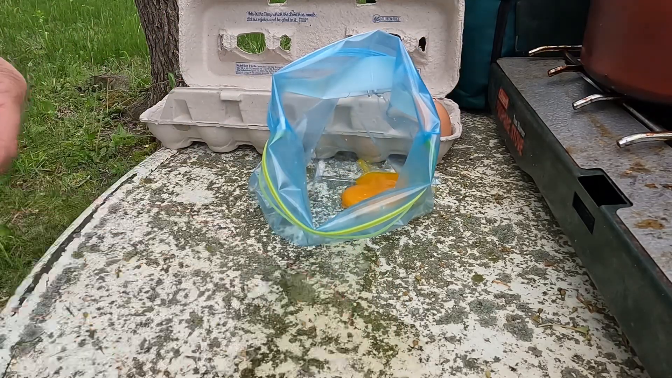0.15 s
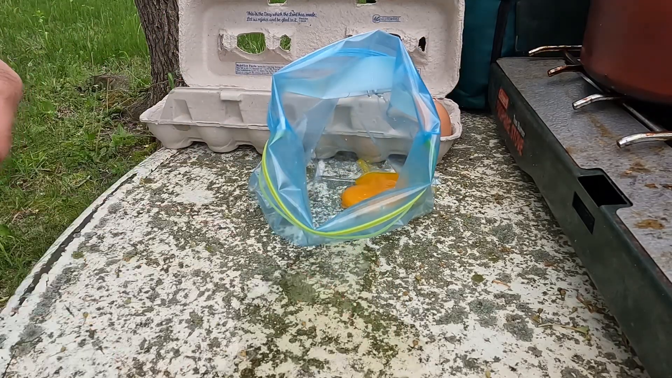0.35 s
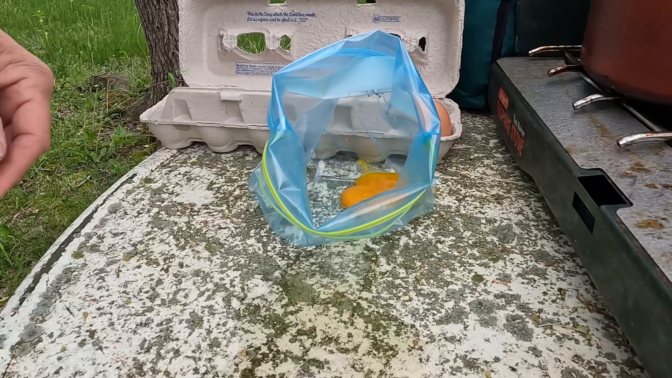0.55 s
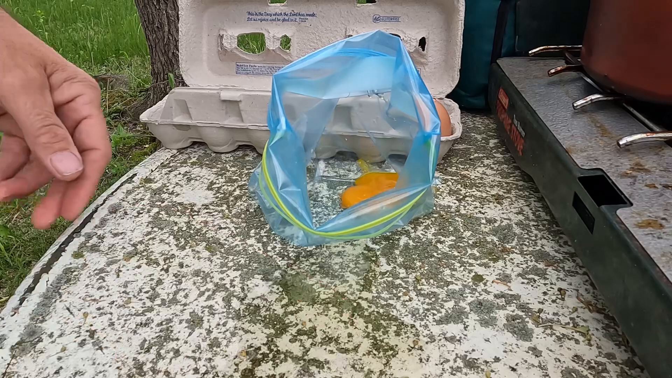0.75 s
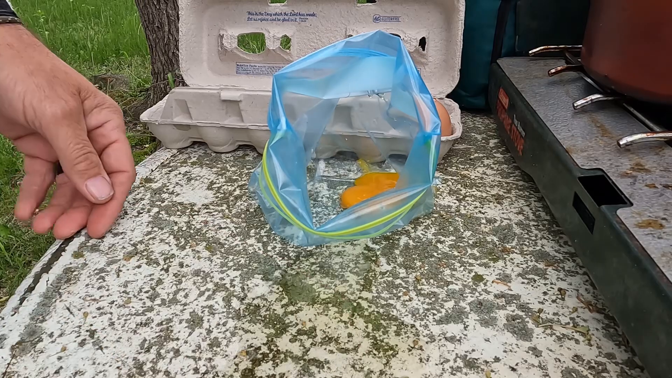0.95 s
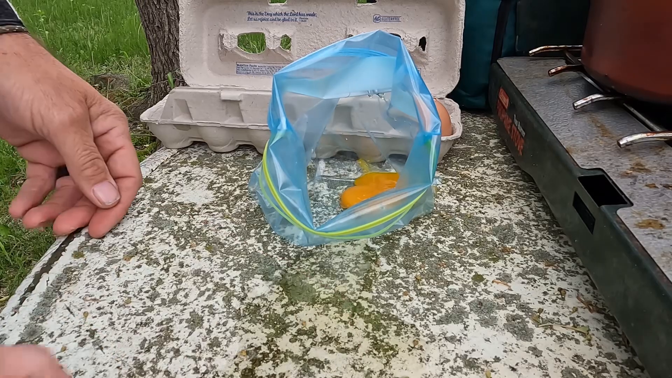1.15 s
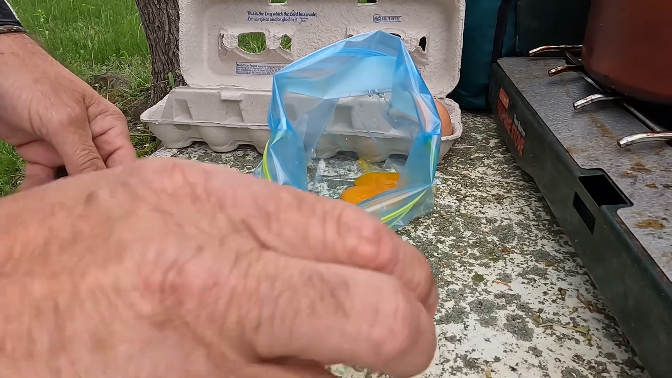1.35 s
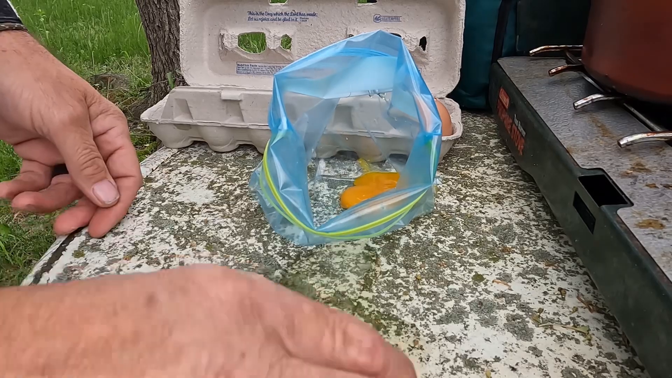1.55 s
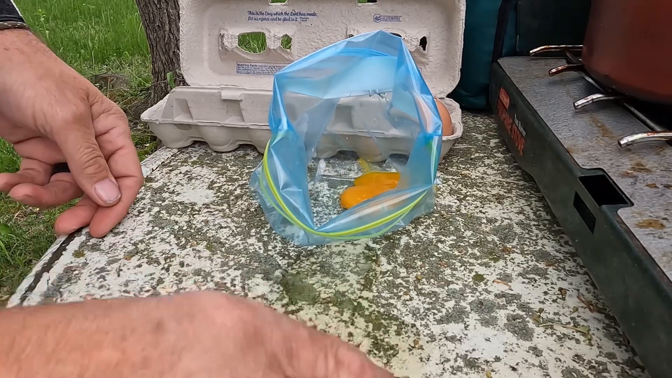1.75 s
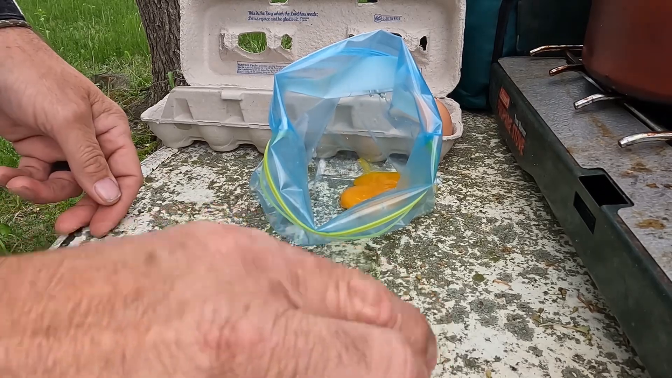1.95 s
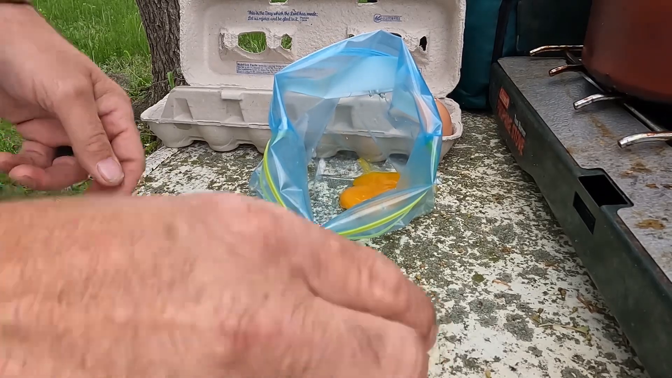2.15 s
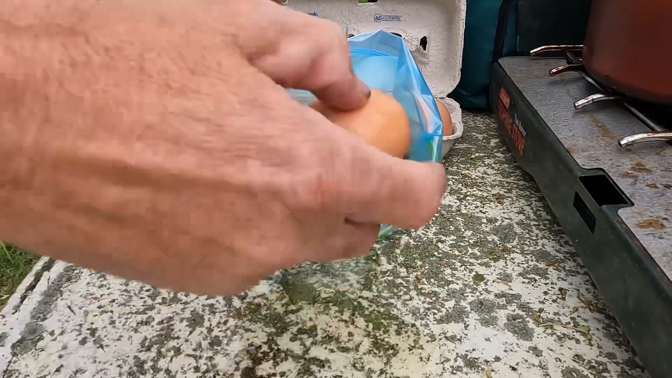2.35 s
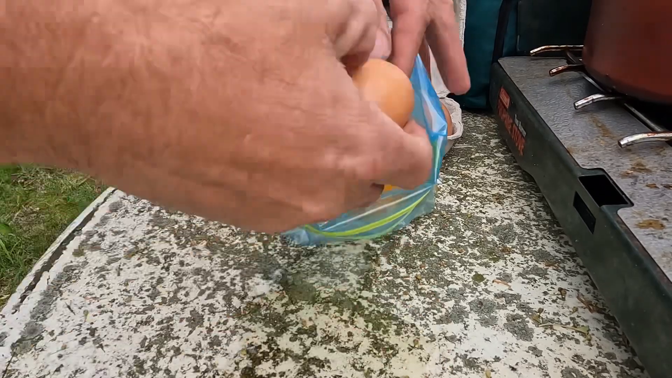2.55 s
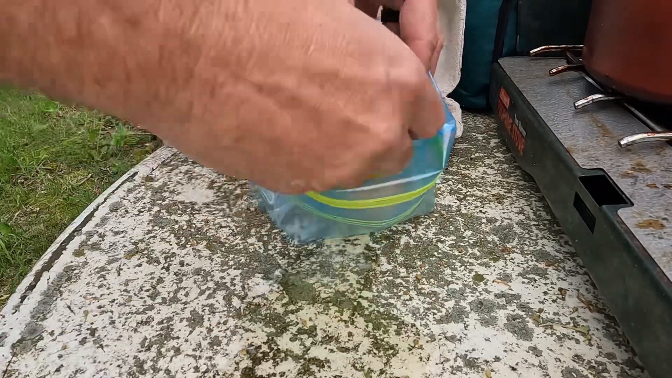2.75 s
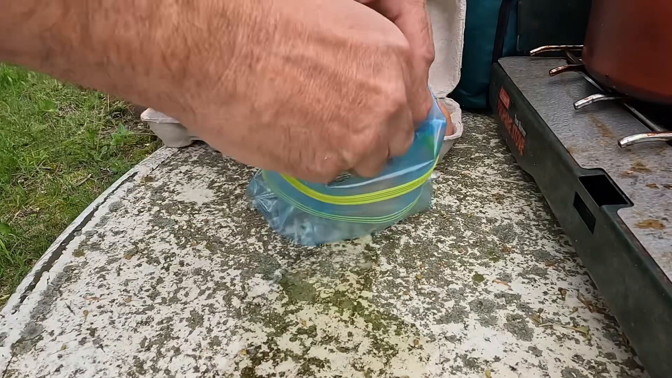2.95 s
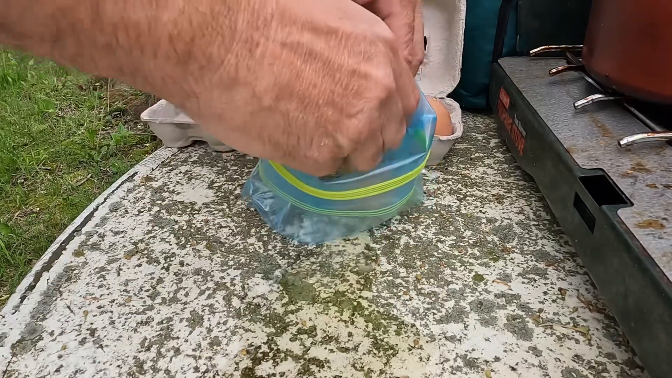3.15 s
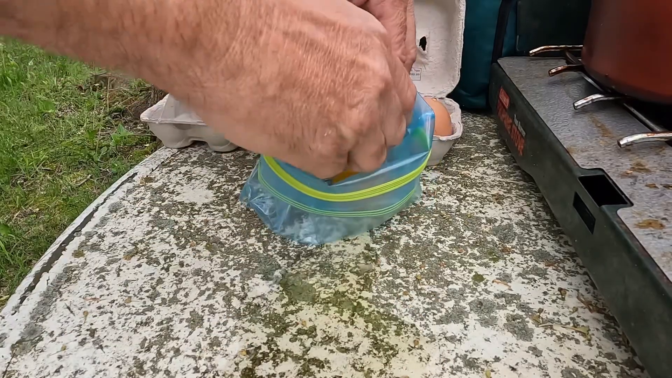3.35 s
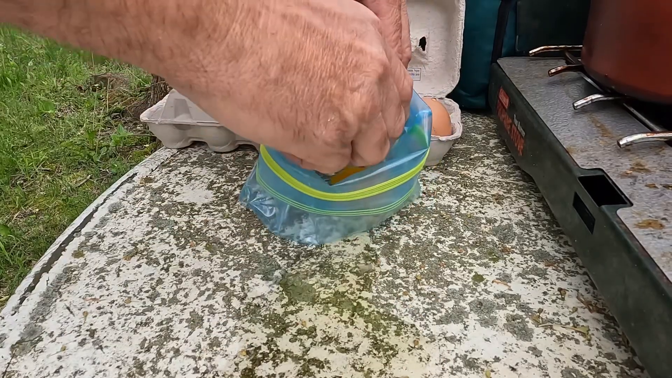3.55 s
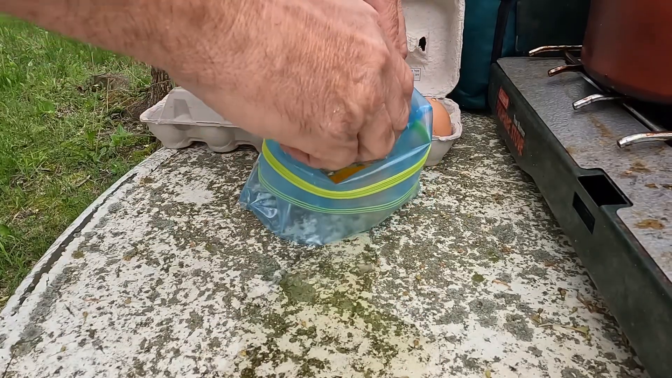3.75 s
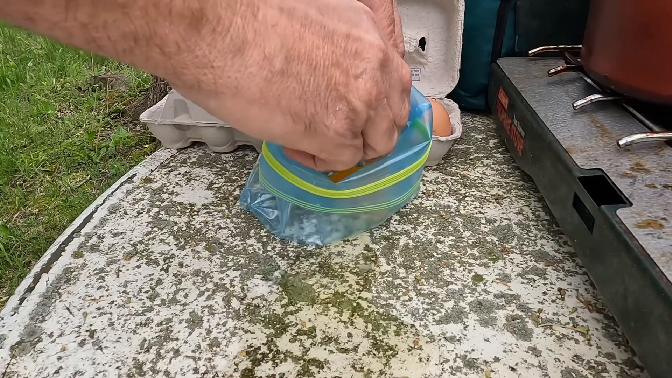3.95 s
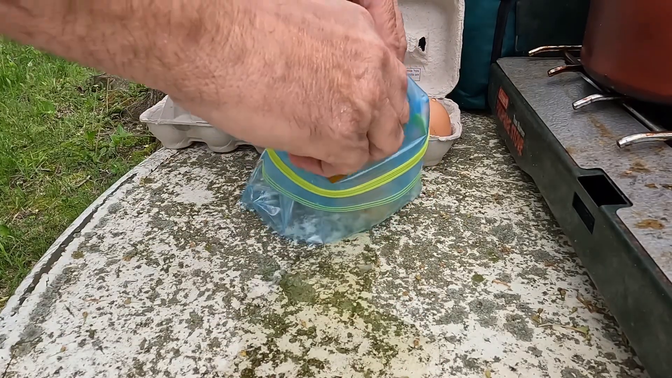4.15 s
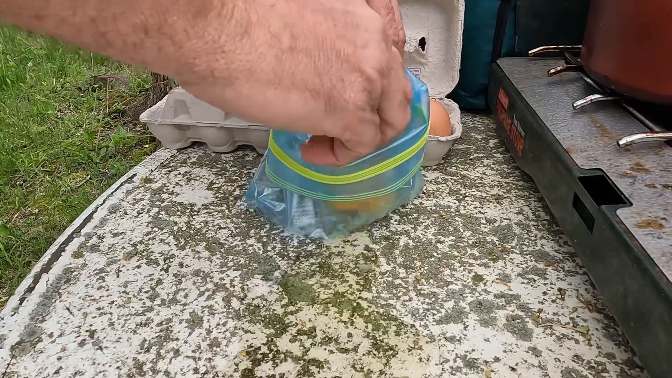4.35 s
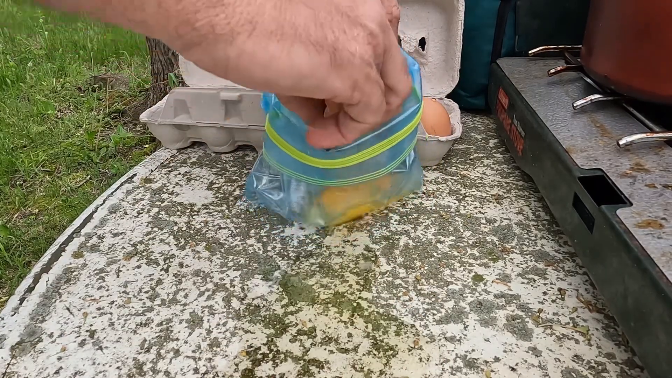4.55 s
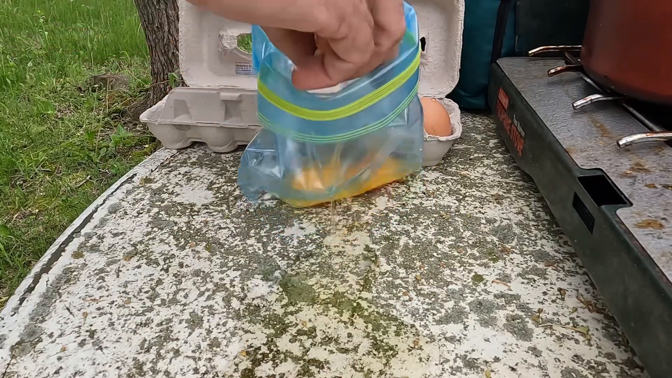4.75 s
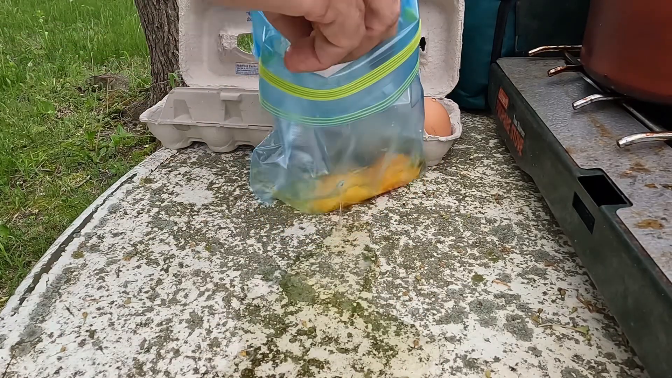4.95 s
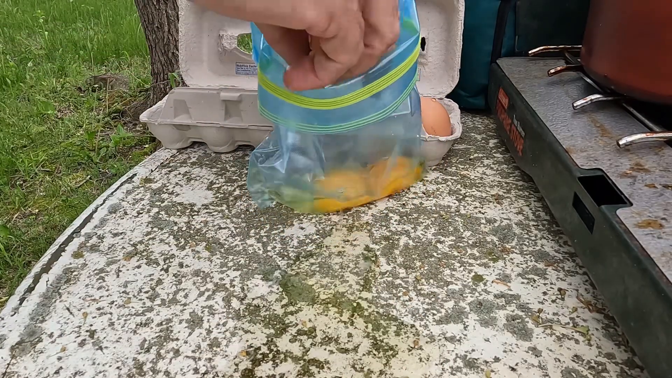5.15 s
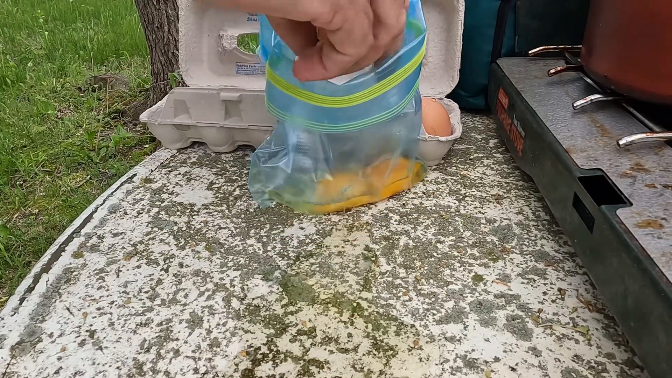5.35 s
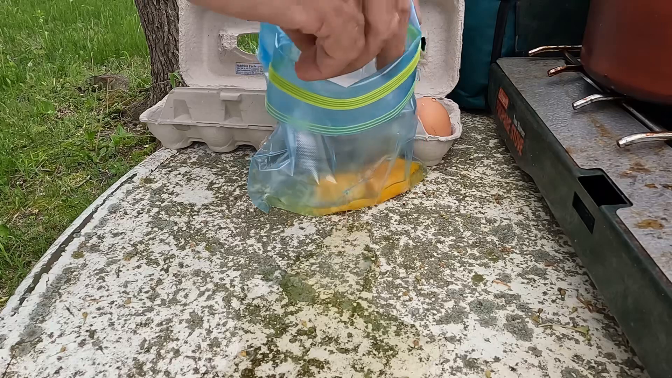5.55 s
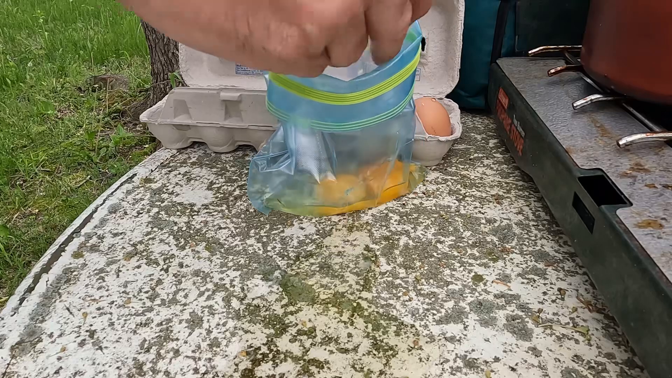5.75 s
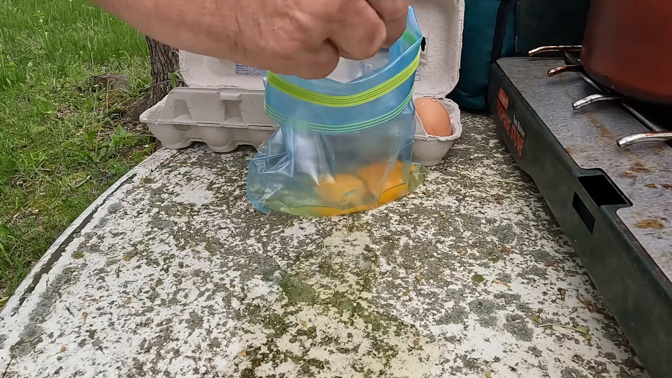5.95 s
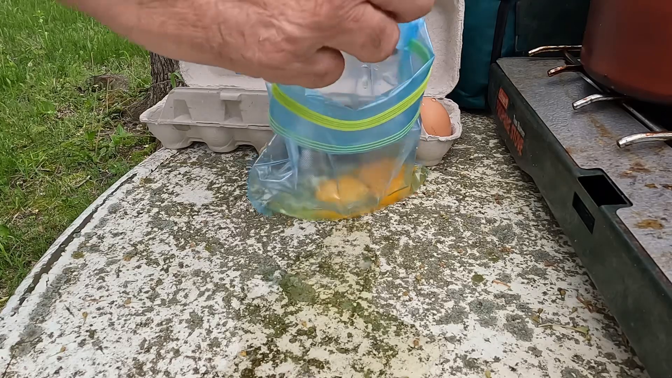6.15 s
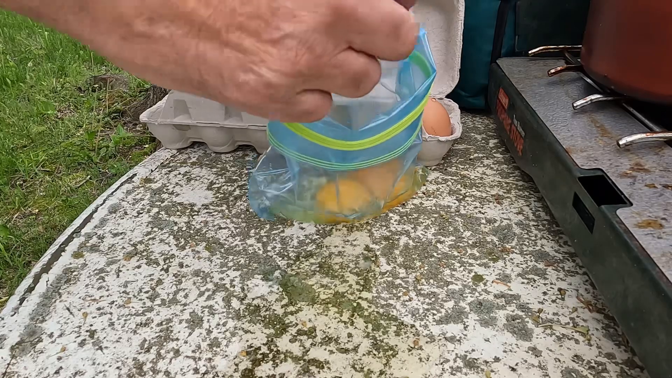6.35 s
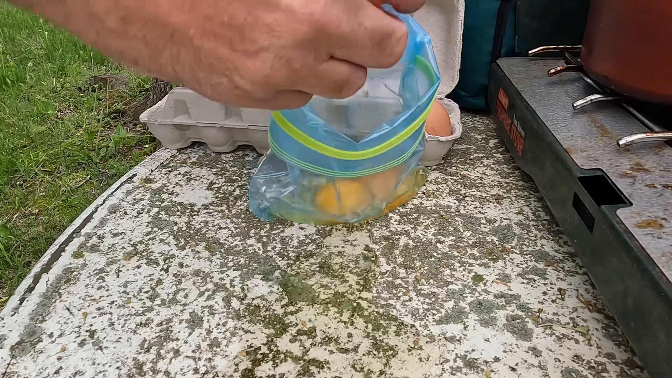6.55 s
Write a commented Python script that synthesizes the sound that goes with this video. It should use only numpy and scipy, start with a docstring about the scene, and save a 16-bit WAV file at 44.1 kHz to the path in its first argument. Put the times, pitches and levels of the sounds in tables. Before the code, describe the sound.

An egg is knocked three times on a ringing table outdoors, then cracked open over a clicking, rustling plastic bag.

```python
"""Outdoors at a light camp table, close to a camera's stereo microphone. An egg is knocked three times
on the top, which rings, shakes and makes the things on it hop. The shell is then cracked open over a
plastic bag whose creases click, rustle and squeak. Beneath lie a hiss with fixed resonances, low rumble,
wind on the microphone and a faint far bird.
The camera turns its gain down after the knocks and lets it creep back."""
import sys
import numpy as np
from scipy import signal
from scipy.fft import rfft, irfft, next_fast_len
from scipy.io import wavfile
from scipy.ndimage import map_coordinates

SR = 44100
rng = np.random.default_rng(int(sys.argv[2]) if len(sys.argv) > 2 else 0)


def to_wav(s):
    """Save 16-bit WAV."""
    ch = np.atleast_2d(s).T  # columns
    pcm = np.round(np.clip(ch, -1, 1) * 32767)  # PCM
    wavfile.write(sys.argv[1], SR, pcm.astype(np.int16))


N = 294718

# strength of the outdoor air at the microphone: time_s, wind_db, rumble_db
BREEZE = [(0.0, -44, -50), (0.24, -43, -50.5), (0.43, -42.5, -50.5), (0.65, -47.5, -50), (0.84, -54, -53),
          (1.08, -49, -45), (1.39, -41, -52.5), (2.3, -54, -52), (2.81, -46.5, -50), (3.12, -50, -48.5),
          (3.52, -51, -51.5), (4.26, -60, -49), (4.8, -46.5, -45), (5.08, -58.5, -49.5),
          (5.6, -54.5, -49.5), (6.05, -55.5, -50), (6.42, -52, -50.5), (6.68, -46, -46)]
# spectrum of wind on the microphone: frequency_hz, relative_db
WIND_SPECTRUM = [(8.8, -29), (15, 1), (34, 2.5), (65, -14.5), (90, -9.5), (120, -33), (200, -120)]
# spectrum of the far rumble: frequency_hz, relative_db
RUMBLE_SPECTRUM = [(29, -24), (50, -1.5), (81, -2), (113, -5.5), (151, -4.5), (194, -7.5), (254, -13),
                   (330, -26), (430, -48), (730, -120)]
# how alike left and right hear the rumble and hiss: frequency_hz, correlation
AMBIENT_LIKENESS = [(60, 1), (450, 0.95), (900, 0.67), (3300, 0.65), (5600, 0.8), (6000, 0.66),
                    (7600, 0.98), (8200, 0.98), (14000, .999)]
# how busily the hands work the bag: time_s, body_db, treble_db
HANDS = [(2.4, -64, -88), (2.58, -63, -86), (2.7, -55.5, -69), (2.8, -62, -88), (3.1, -53, -75),
         (3.3, -62, -95), (3.6, -57, -86), (3.68, -55.5, -56), (3.8, -57.5, -88), (4.4, -58, -84),
         (4.62, -54.5, -80), (4.82, -47.5, -60), (5.02, -57, -89), (5.28, -54, -69), (5.6, -60, -80),
         (6.2, -57, -76), (6.5, -61, -84), (6.6, -57.5, -76), (6.68, -59, -81)]
# louder snaps of shell and bag: start_s, level_db, centre_hz, breadth_octaves, thud_db, sparkle_db
SNAPS = [(1.2186, -36, 2040, 0.51, -5, -9), (2.873, -29, 4370, 0.18, -22.5, -26),
         (2.8764, -10, 3700, 0.27, -12, -13), (2.906, -27, 2190, 0.63, -2, -20),
         (3.0356, -24.5, 2880, 0.72, 4, -16), (3.0804, -21, 3450, 0.26, -12, -14),
         (3.0918, -20.5, 3560, 0.69, -5.5, -18), (3.1198, -28.5, 4140, .61, -5, -30),
         (3.196, -28, 2600, 0.63, 0.5, -21), (3.4855, -43, 1390, 0.38, 12, -24),
         (3.562, -34, 3220, 0.11, -18, -30), (3.6342, -30.5, 3550, 0.57, -3, -6),
         (3.6603, -39, 3920, .65, -10, -8), (3.7071, -27.5, 2100, 0.51, -5, -23),
         (3.8737, -29, 3280, 0.42, 10, 3), (3.881, -32, 4250, .63, -11, -11),
         (4.0143, -32.5, 2590, 1.24, 5, -4), (4.0473, -31.5, 4480, 0.71, 7.5, -0.5),
         (4.1428, -11.5, 3600, 0.35, -11.5, -26), (4.1609, -22.5, 2960, 0.31, -5, -16),
         (4.1669, -27, 3200, 0.14, -8, -27), (4.1929, -18, 2620, 0.36, -13, -16.5),
         (4.2848, -22.5, 2980, 0.33, -31, -18), (4.306, -33, 3180, 0.52, -39, -27),
         (4.4993, -30, 1400, .41, -1, -38), (4.508, -32, 3080, 0.71, -12, -37),
         (4.6328, -22.5, 3060, 0.8, -4, -33), (4.723, -25.5, 1760, 0.92, -1, -18),
         (4.7355, -20.5, 1300, .41, -7, -26), (4.7697, -24, 2750, 0.72, -31, -24),
         (4.7961, -20, 1500, .68, -3, -22), (4.803, -22.5, 2600, 0.72, -10, -19),
         (4.8135, -25.5, 2960, .37, 1, -19), (4.842, -19, 1690, 0.9, -11, -19),
         (4.8623, -16.5, 2110, 0.96, 7.5, -24), (4.8887, -21.5, 3800, 0.82, -14, -20),
         (4.919, -22.5, 3460, 0.48, -6, -23), (4.9271, -28.5, 3800, 0.34, -9, -7),
         (4.956, -19.5, 3550, 0.97, -3.5, -16), (4.996, -29, 2080, 0.13, -5, -26),
         (5.1063, -34, 2030, .31, -10, -32), (5.151, -17.5, 1710, 0.54, -18, -32),
         (5.1575, -18, 1480, 0.35, -17, -30), (5.1609, -15, 2130, 0.29, -25, -28),
         (5.1882, -25.5, 2290, .68, -8, -14), (5.2058, -22.5, 1860, .76, -7, -25),
         (5.2147, -21, 2850, 0.8, -1.5, -16), (5.259, -24, 2280, 0.96, -8, -21),
         (5.2844, -28, 2100, 0.19, -7, -25), (5.4357, -34.5, 1680, 0.58, 6, -17),
         (5.5262, -23, 2160, 0.82, -8, -30), (5.539, -30, 3070, 0.48, -35, -16),
         (5.761, -33, 1390, 0.44, 0, -32), (5.8972, -29, 1220, 0.25, 0, -26),
         (6.027, -16.5, 2780, 0.32, -36, -7), (6.0737, -19, 2570, 0.27, -29, -19.5),
         (6.101, -35, 2900, 0.26, -20, -20), (6.3293, -38, 2970, .41, 0, -8),
         (6.3692, -36, 2990, .8, -6, -13), (6.4307, -31.5, 2240, .66, 2, -26),
         (6.56, -31, 2040, .76, -16, -17), (6.573, -35, 3370, 1.6, -24, -2),
         (6.5998, -35, 3900, 0.42, -18, -5), (6.6252, -35.5, 3450, 0.6, -16, -4),
         (6.664, -28.5, 2560, .55, -15, -36)]
# the egg meets the table: start_s, level_db, crack_db, splinter_db, sway_db
KNOCKS = [(1.5598, -3.5, -11.5, -42, -16), (1.8141, -6, -8, -38, -9.5), (2.0881, -8.5, -6.5, -37, -4)]


def amp(db):
    """Decibels to amplitude."""
    return 10 ** (np.asarray(db) / 20)


def unit(x):
    """Scales to an rms of 1."""
    return x / np.sqrt(np.mean(x ** 2) + 1e-20)


def along(points, hz):
    """Reads (frequency_hz, value) points on a log frequency axis."""
    freqs, values = np.transpose(points)
    return np.interp(np.log(hz + 1), np.log(freqs + 1), values)


def curves(rows):
    """One value per sample for each column after the time."""
    times, *columns = np.transpose(rows)
    return [np.interp(np.arange(N) / SR, times, column) for column in columns]


def wobble(rate):
    """A smooth random curve, rate knots a second."""
    return map_coordinates(rng.standard_normal(int(N * rate / SR) + 4), [np.arange(N) * rate / SR])


def swells(events, rise_s, fall_s):
    """Power curve in which each (time_s, level_db) event rises and falls exponentially."""
    t = np.arange(0, N, 32) / SR
    s, db = np.transpose(events)[:, :, None]
    power = amp(2 * db) * np.exp(-2 * np.where(t < s, (s - t) / rise_s, (t - s) / fall_s))
    return np.interp(np.arange(N) / SR, t, power.sum(axis=0))


def filtered(x, response):
    """Filters x by a gain given as a function of frequency."""
    size = next_fast_len(x.shape[-1] + 4096)
    return irfft(rfft(x, size) * response(np.fft.rfftfreq(size, 1 / SR)), size)[..., :x.shape[-1]]


def stereo_noise(gain, likeness, size):
    """Noise of rms 1, its channels as alike as the (frequency_hz, correlation) points say."""
    def mid_side_gain(hz):
        angle = np.arccos(np.clip(along(likeness, hz), -1, 1)) / 2
        return gain(hz) * [np.cos(angle), np.sin(angle)]
    mid, side = filtered(rng.standard_normal((2, size)), mid_side_gain)
    return unit(np.array([mid + side, mid - side]))


def shaped_noise(spectrum, correlation, size):
    """Stereo noise with a (frequency_hz, relative_db) spectrum and one left-right correlation."""
    return stereo_noise(lambda f: amp(along(spectrum, f)), [(1000, correlation)], size)


def pan(db):
    """Channel gains that put the left db above the right."""
    return amp([[db / 2], [-db / 2]])


def add(out, start_s, sound):
    """Mixes a sound in at start_s."""
    part = out[:, round(start_s * SR):][:, :sound.shape[1]]
    part += sound[:, :part.shape[1]]


def narrowed(x):
    """The stereo image closes to the centre after the knocks, then slowly reopens."""
    # gain of the left-right difference: time_s, side_db
    width = [(0, 0.5), (2.2, 1.5), (2.5, -48), (4.1, -20), (4.6, -9.5), (4.95, -5), (5.1, -2.5), (5.6, 0),
             (6.68, 0.5)]
    mid = (x[0] + x[1]) / 2
    side = (x[0] - x[1]) / 2 * amp(curves(width)[0])
    return np.array([mid + side, mid - side])


def hiss():
    """A hiss that keeps its resonances; hands and bag shade its upper part."""
    # the broad hiss: frequency_hz, relative_db
    spectrum = [(200, -37), (300, -0.5), (430, 1.5), (650, -12.5), (1400, -9), (2300, -13), (5300, -16.5),
                (6000, -23.5), (7600, -23.5), (8100, -32), (9300, -27), (12200, -34.5), (14000, -42),
                (15000, -70)]
    # resonances standing over it: centre_hz, width_hz, boost_db
    resonances = [(440, 50, 5), (1000, 60, 4), (1385, 60, 7), (1745, 45, 12), (2150, 57, 4), (2600, 110, 5),
                  (2965, 90, 7), (3750, 66, 8), (4190, 60, 9), (4575, 60, 4), (5120, 250, 4), (5550, 50, 8),
                  (6700, 60, 7), (7110, 170, 7), (7480, 64, 9), (8790, 190, 12), (9750, 88, 8),
                  (10700, 60, 8)]
    # its balance at the microphone: frequency_hz, left_over_right_db
    balance = [(60, 1.5), (130, -1), (290, -2), (640, 1.5), (1410, 1.5), (3100, -4), (6820, -1), (15000, 1)]
    # level of its upper part: time_s, level_db
    upper_level = [(0, -52), (1.55, -52), (2.3, -62), (2.81, -56.5), (3.12, -53), (3.52, -60.5),
                   (4.26, -55), (4.76, -57.5), (5.1, -54.5), (6.05, -55), (6.5, -51)]
    low_db, split_hz = -54, 750
    boost_db = lambda f: sum(db / (1 + (2 * (f - hz) / width) ** 2) for hz, width, db in resonances)
    noise = stereo_noise(lambda f: amp(along(spectrum, f) + boost_db(f)), AMBIENT_LIKENESS, N)
    noise = filtered(noise, lambda f: amp(np.outer([.5, -.5], along(balance, f))))
    low = filtered(noise, lambda f: 1 / (1 + (f / split_hz) ** 4))
    return amp(low_db) * low + amp(curves(upper_level)[0]) * (noise - low)


def rumble():
    """Low noise from far off, wavering slightly."""
    _, rumble_db = curves(BREEZE)
    level = amp(rumble_db + wobble(15))
    return level * stereo_noise(lambda f: amp(along(RUMBLE_SPECTRUM, f)), AMBIENT_LIKENESS, N)


def far_bird():
    """Distance blurs each rising note into narrow noise with a wide halo."""
    # faint notes: start_s, length_s, start_pitch_hz, level_db
    notes = [(2.527, 0.23, 3400, -64), (2.621, 0.16, 2850, -58.5), (3.189, 0.11, 2870, -58),
             (3.367, .21, 3100, -57.5), (3.497, 0.14, 3610, -57.5), (3.597, 0.19, 4400, -58),
             (3.701, 0.34, 2850, -59), (3.87, .129, 3300, -60), (3.996, 0.093, 3940, -58.5)]
    rise_hz_per_s = 453
    out = np.zeros((1, N))
    blur = wobble(330) + .8 * wobble(1300)
    for start, length, hz, db in notes:
        t = np.arange(round(length * SR)) / SR
        note = np.sin(2 * np.pi * (hz + rise_hz_per_s * t / 2) * t)
        add(out, start, amp(db) * (np.hanning(len(t)) ** .5 * note)[None])
    return blur * out


def wind():
    """Air buffets the microphone in deep, uneven lumps."""
    wind_db, _ = curves(BREEZE)
    lumps = amp(4.6 * wobble(9.1))
    return amp(wind_db) * lumps * shaped_noise(WIND_SPECTRUM, 0.97, N) * pan(-2.9)


def wind_thumps():
    """Each push of wind swings the diaphragms once or twice."""
    # pushes on the microphone: start_s, level_db, pitch_hz
    pushes = [(0.261, -24.5, 38.7), (0.374, -28.5, 44.5), (0.657, -42, 26.9)]
    t60_s = .15
    out, t = np.zeros((2, N)), np.arange(SR // 4) / SR
    for s, db, hz in pushes:
        add(out, s, pan(-6) * amp(db - 60 * t / t60_s) * np.sin(2 * np.pi * hz * t))
    return out


def bag_rustle():
    """Many tiny creases: noise gated by dense grains, swelling with the hands and the louder snaps."""
    # body of the plastic film's rustle: frequency_hz, relative_db
    body_spectrum = [(240, -65), (400, -4), (521, -0.5), (608, -11), (994, -4.5), (1570, -10), (2690, -9.5),
                     (7000, -25), (9100, -53), (15400, -120)]
    # its treble sheen: frequency_hz, relative_db
    sheen_spectrum = [(4000, -8), (6000, -3.5), (7500, -5), (10000, -16.5), (13000, -18), (15500, -17)]
    creases_per_s, flurry_body_db, flurry_treble_db = 900, -29.5, -14.5
    body_db, treble_db = curves(HANDS)
    body_flurries = [(s, db + flurry_body_db) for s, db, *_ in SNAPS]
    treble_flurries = [(s, db + sparkle_db + flurry_treble_db) for s, db, *_, sparkle_db in SNAPS]
    body_power = amp(2 * body_db) + swells(body_flurries, rise_s=0.0035, fall_s=0.01)
    treble_power = amp(2 * treble_db) + swells(treble_flurries, rise_s=0.0035, fall_s=0.01)
    grains = (rng.random(N) < creases_per_s / SR) * amp(2.8 * rng.exponential(size=N))
    gate = unit(.5 + filtered(grains, lambda f: 40 / (1 + 1j * f / 120) ** 2))
    body = np.sqrt(body_power) * shaped_noise(body_spectrum, 0.97, N)
    sheen = np.sqrt(treble_power) * shaped_noise(sheen_spectrum, 0.38, N)
    fade_in = np.clip((np.arange(N) / SR - HANDS[0][0]) / .1, 0, 1)
    return fade_in * gate * (body + sheen)


def bag_squeaks():
    """Film slips on wet skin: short tones with two weak overtones."""
    # slips: peak_s, level_db, pitch_hz, half_width_s
    slips = [(4.253, -54, 3850, .002), (4.266, -34.5, 3780, .002), (4.285, -37, 3830, 0.0036),
             (4.298, -46, 3650, .003), (4.307, -45, 3760, .004), (4.315, -55, 3690, .003)]
    out, lead_s = np.zeros((1, N)), .02
    t = np.arange(SR // 25) / SR - lead_s
    for s, db, hz, half_width in slips:
        phase = 2 * np.pi * hz * t
        tone = np.sin(phase) + 0.13 * np.sin(1.5 * phase) + 0.072 * np.sin(2 * phase)
        add(out, s - lead_s, (amp(db) * np.exp(-(t / half_width) ** 2 / 2) * tone)[None])
    return out


def faint_snaps(count):
    """Random quiet rows like those of SNAPS, more often where the hands are busy."""
    level_db, centre_hz, octaves, thud_db, sparkle_db = -44.5, 2800, 0.49, -17, -13.5
    t = np.arange(N) / SR
    effort = np.cumsum(amp(curves(HANDS)[0]) * (t > HANDS[0][0]))
    times = np.interp(rng.random(count), effort / effort[-1], t)
    scatter = rng.standard_normal((count, 4))
    return [(s, level_db + 3 * a, centre_hz * np.exp(0.18 * b), octaves,
             thud_db + 6 * c, sparkle_db + 5 * d) for s, (a, b, c, d) in zip(times, scatter)]


def snaps():
    """Shell splinters or a crease buckles: a burst, a broad tick, sparkle, a thud of the air inside."""
    out, lead_s = np.zeros((2, N)), .012
    t = np.arange(SR // 16) / SR - lead_s
    onset = amp(-12 + 60 * t / .05) + amp(60 * t / .004)  # slow creak, then quick release
    jolt = 1 + 3 * np.exp(-(t / 0.00067) ** 2)  # the break itself heads the splinters

    def burst(centre_hz, octaves, t60_s):
        envelope = jolt / (amp(60 * t / t60_s) + 1 / onset)
        push = envelope * stereo_noise(np.ones_like, [(1000, 1.0), (3000, 0.95)], len(t))
        band = filtered(push, lambda f: np.exp(-(np.log2((f + 1) / centre_hz) / octaves) ** 2 / 2))
        return 3 * band / np.linalg.norm(band)
    for s, db, hz, breadth, thud_db, sparkle_db in SNAPS + faint_snaps(count=18):
        snap = burst(hz, breadth, t60_s=0.03)
        tick = amp(-18) * burst(2900, 0.79, t60_s=0.03)
        sparkle = amp(sparkle_db) * burst(6600, 0.56, t60_s=0.02)
        thud = amp(thud_db) * burst(596, 0.54, t60_s=0.044)
        add(out, s - lead_s, amp(db) * pan(rng.normal(-1, 0.5)) * (snap + tick + sparkle + thud))
    return out


def table_shake():
    """Deep and upper bass noise lingers in the top and legs after each knock."""
    over_sway_db, rise_s, top_hz = -22.5, 0.099, 160
    out, t = np.zeros((2, N)), np.arange(N) / SR
    for t60_s, spectrum in [(1.8, WIND_SPECTRUM), (1.3, RUMBLE_SPECTRUM)]:
        power = np.zeros(N)
        for s, *_, sway_db in KNOCKS:
            age = np.clip(t - s, 0, None)
            rise = 1 - np.exp(-age / rise_s)
            power += (rise * amp(sway_db + over_sway_db - 60 * age / t60_s)) ** 2
        bass = stereo_noise(lambda f: amp(along(spectrum, f)) / (1 + (f / top_hz) ** 2), [(60, 1.0)], N)
        out += np.sqrt(power) * bass
    return out


def clatter(decay_speed):
    """The table's dense ring between its modes: noise in which each frequency dies at its own pace."""
    # colour of the ring: frequency_hz, relative_db
    spectrum = [(35, -38), (60, 5.5), (253, -1.5), (368, -6.5), (572, -4.5), (829, -12), (1420, -6),
                (1790, -9.5), (2310, -11), (3760, -15), (4630, -22.5), (11500, -43), (15500, -107)]
    # its decay at a decay_speed of 1: frequency_hz, t60_s
    decay_times = [(40, 0.97), (110, 0.39), (280, 1), (740, 0.62), (1940, 0.27), (5120, 0.23), (13500, 0.1)]
    size = SR * 3 // 4
    likeness = [(100, 0.84), (700, 1.0), (3000, 0.61), (9000, 0.91)]
    noise = stereo_noise(lambda f: amp(along(spectrum, f)), likeness, size)
    hz, t, bands = signal.stft(noise, SR, nperseg=256)
    decay = amp(-60 * t * decay_speed / along(decay_times, hz)[:, None])
    return signal.istft(bands * decay, SR, nperseg=256)[1][:, :size]


def hops():
    """Things on the table hop after the knocks and land with a thin clatter."""
    # landings: start_s, level_db
    landings = [(1.58, -29), (1.6772, -34), (1.8754, -29.5), (1.9315, -30), (2.045, -40.5), (2.145, -42),
                (2.2064, -34)]
    out = np.zeros((2, N))
    thin = lambda f: f / (f + 1500) / (1 + (f / 8000) ** 4)
    for s, db in landings:
        add(out, s, amp(db) * filtered(clatter(decay_speed=1.3), thin))
    return out


def egg_knocks():
    """Each knock cracks the shell, rings the table top and makes the legs give once."""
    # modes of the table top: pitch_hz, level_db, t60_s
    table_modes = [(49, -5.5, 0.49), (94.2, -1.5, 0.71), (123.6, -1.5, 0.8), (151, -1.5, 0.25),
                   (173.7, 3.5, 0.26), (237.6, 2.5, 0.32), (349, -4.5, 0.25), (430, -14, 0.18),
                   (471, -9, 0.13), (547, 2.5, 0.2), (745, -9.5, 0.52), (964, -13.5, 0.46),
                   (1018, -7, 0.17), (1315, 2, 0.11), (1350, -9.5, 0.39), (1437, -13, 0.15),
                   (1566, -12.5, 0.38), (1470, -6.5, 0.29), (2400, -10, 0.21), (3470, -18, 0.064)]
    # the shell's own short modes: pitch_hz, level_db, t60_s
    shell_modes = [(1400, -2.5, 0.0076), (2350, -17, 0.01), (3380, -4, 0.0077), (5600, -16, 0.011)]
    # the crack of the contact: frequency_hz, relative_db
    crack_spectrum = [(180, -26), (300, 3.5), (699, -8), (1400, -28), (2680, -27), (3490, -10), (4120, -5),
                      (5560, -17), (11900, -25), (15800, -44)]
    # flying bits of shell: frequency_hz, relative_db
    splinter_spectrum = [(3500, -12), (6000, 6), (7800, -8), (10200, -3), (13000, -18), (15500, -19)]
    out, t = np.zeros((2, N)), np.arange(SR * 3 // 4) / SR
    rise = 1 - np.exp(-t / 0.00081)
    pans_db = rng.normal(-3.5, 4.0, len(table_modes))  # the two ports hear each mode differently

    def mode(hz, db, t60_s):
        envelope = amp(db + rng.normal(0, 1.5) - 60 * t / t60_s)
        return envelope * np.sin(2 * np.pi * hz * t + rng.normal(0, .4))
    for s, db, crack_db, splinter_db, sway_db in KNOCKS:
        ring = amp(-16.5) * sum(pan(pan_db) * mode(*row) for row, pan_db in zip(table_modes, pans_db))
        shell = amp(0.5) * sum(mode(*row) for row in shell_modes)
        crack = shaped_noise(crack_spectrum, 0.86, len(t)) * amp(crack_db - 60 * t / 0.031)
        splinters = shaped_noise(splinter_spectrum, 0.63, len(t)) * amp(splinter_db - 60 * t / 0.051)
        sway = amp(sway_db) * np.exp(-((t - .016) / 0.01) ** 2) * np.sin(2 * np.pi * 43 * t)
        dense_ring = amp(-12.5) * clatter(decay_speed=1.11)
        add(out, s, amp(db) * rise * (ring + dense_ring + shell + crack + splinters + sway))
    return out


def scene():
    """Egg, table and bag up close, over a bed of rustle and outdoor sound that narrows for a while."""
    close = egg_knocks() + hops() + snaps() + bag_squeaks()
    bed = bag_rustle() + far_bird() + wind() + rumble() + hiss() + wind_thumps() + table_shake()
    return close + narrowed(bed)


def record(dry):
    """The camera's gain follows the last second of sound, and the top octave falls away."""
    memory_s, threshold_db, rolloff_hz, top_hz = .9, -22.0, 14500, 15900
    # a faint, thin hiss near 12.7 kHz, unrelated in left and right
    top_hiss = amp(-84.5) * stereo_noise(lambda f: np.exp(-((f - 12700) / 800) ** 2), [(1000, 0)], N)
    pole = np.exp(-1 / (memory_s * SR))
    recent_power = signal.lfilter([1 - pole], [1, -pole], np.mean(dry ** 2, axis=0))
    gain = (1 + recent_power / amp(threshold_db) ** 2) ** -.2
    return filtered(dry * gain + top_hiss, lambda hz: (hz < top_hz) / (1 + (hz / rolloff_hz) ** 12))


dry = scene()
out = record(dry)
to_wav(out)
```